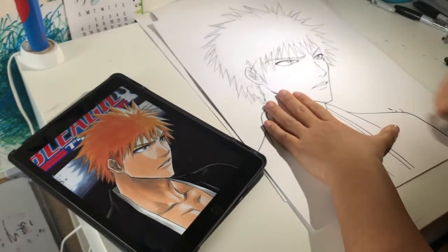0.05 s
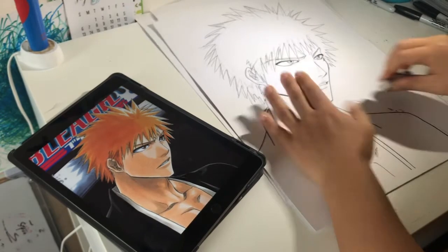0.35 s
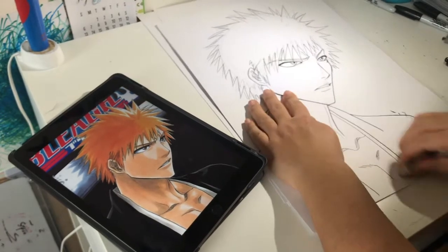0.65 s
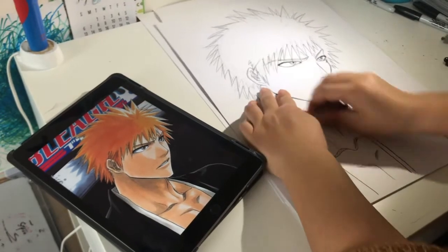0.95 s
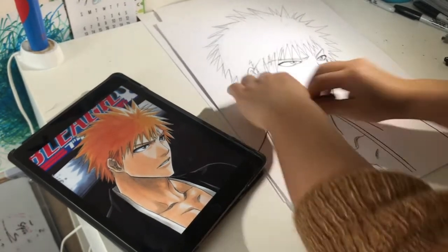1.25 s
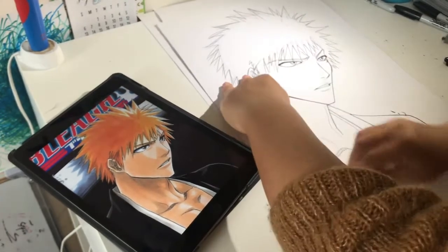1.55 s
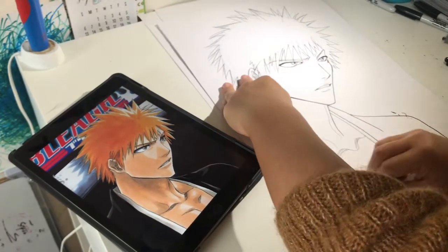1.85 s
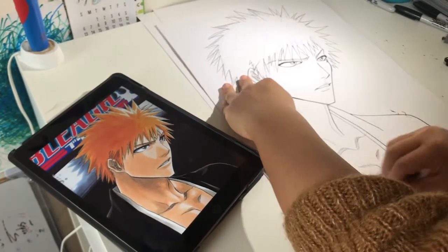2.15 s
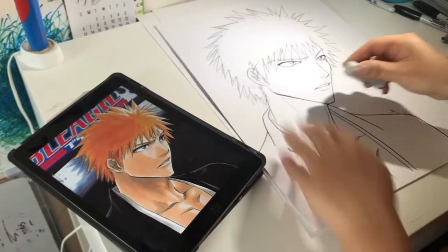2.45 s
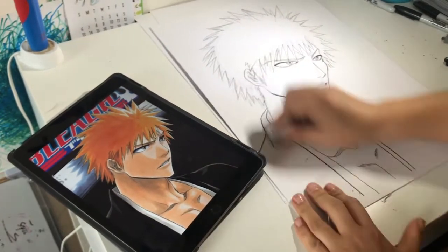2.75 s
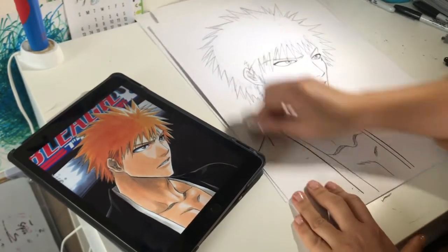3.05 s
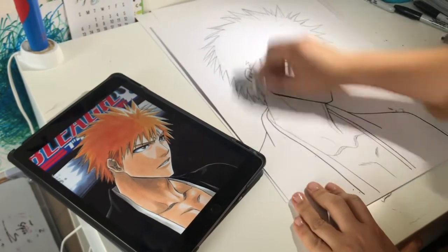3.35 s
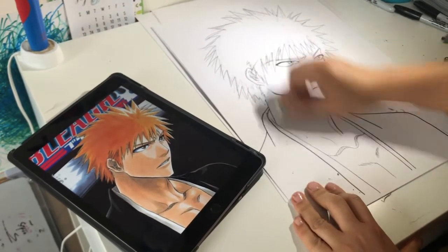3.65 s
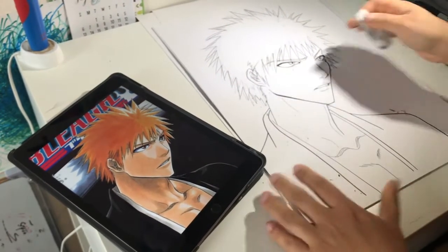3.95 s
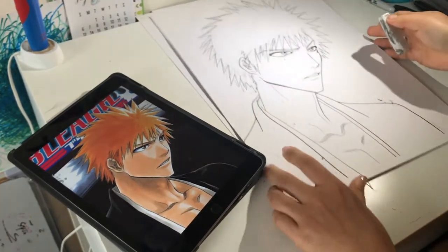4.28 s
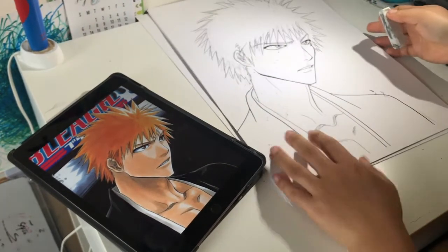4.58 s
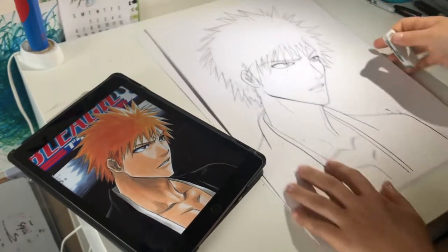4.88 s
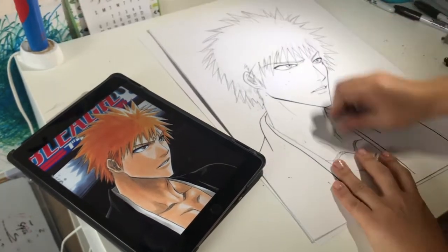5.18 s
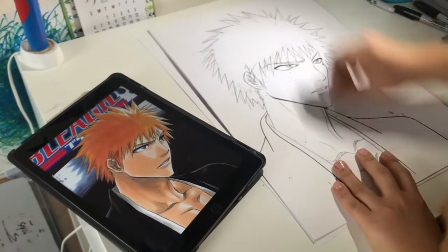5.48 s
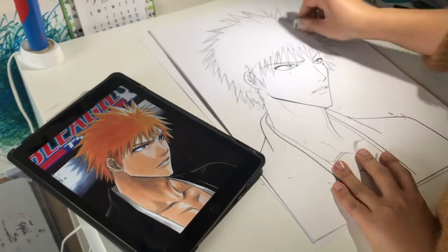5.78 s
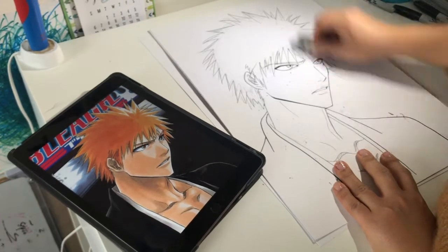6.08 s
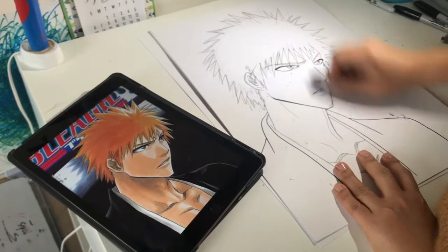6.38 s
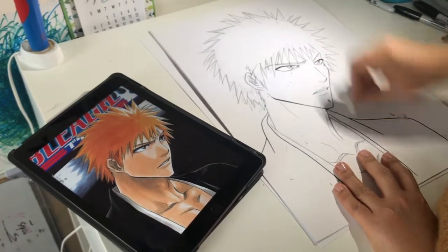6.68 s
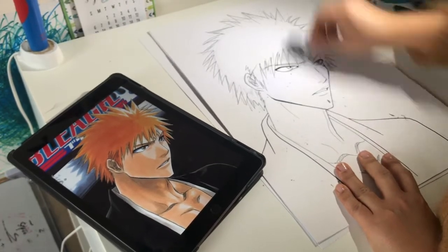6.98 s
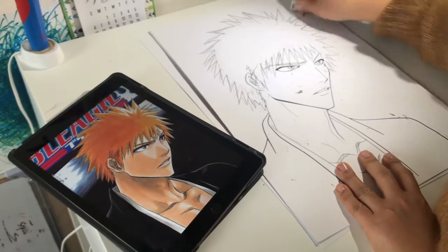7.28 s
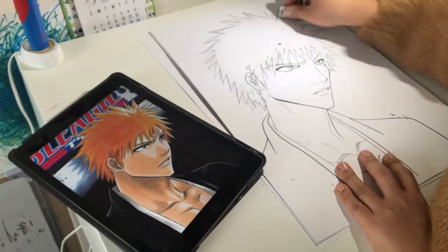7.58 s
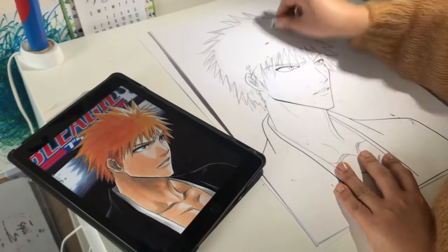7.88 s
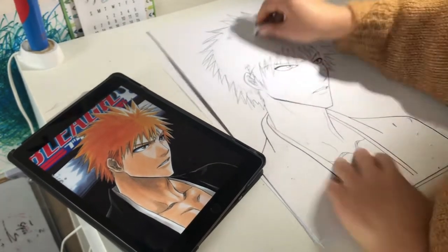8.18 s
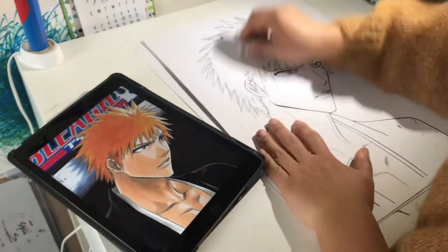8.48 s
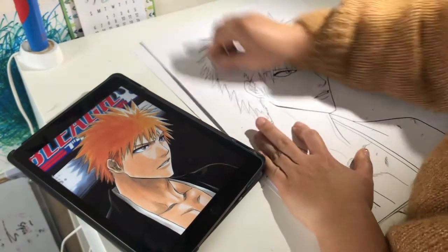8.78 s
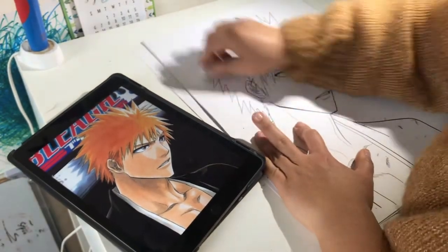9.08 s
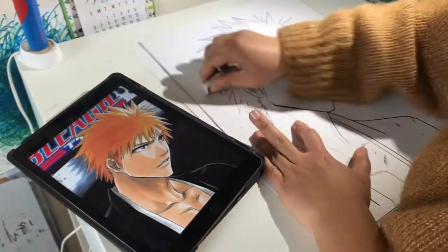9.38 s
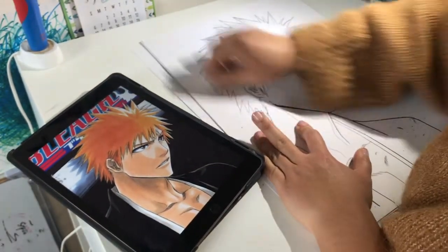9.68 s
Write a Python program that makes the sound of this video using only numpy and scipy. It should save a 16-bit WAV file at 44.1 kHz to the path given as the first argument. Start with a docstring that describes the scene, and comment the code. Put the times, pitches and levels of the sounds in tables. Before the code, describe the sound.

Close to the microphone in a quiet little room, an eraser rasps over paper in separate strokes, mixed with dull hand thuds and a low rumble from the wooden desk. It scrubs briefly, then stops while skin swishes across the sheet with light ticks. The rubbing returns louder, grunting and squeaking a little, and ends in a run of brisk, continuous scrubbing.

```python
"""Eraser on drawing paper

An eraser rubs back and forth over a sheet on a wooden desk, close to a small microphone.
Each landing knocks the desk top; each stroke hisses on the paper's tooth, rasps, and drags the desk
into a low rumble. The rubber sticks and slips in grunts and squeaks. In the pauses a hand thumps
down or slides over the sheet. The room is small and quiet."""
import sys
import numpy as np
from scipy import signal
from scipy.fft import rfft, irfft
from scipy.io import wavfile
from scipy.ndimage import uniform_filter1d

SR = 44100
rng = np.random.default_rng(int(sys.argv[2]) if len(sys.argv) > 2 else 0)


def to_wav(sig):
    """Store sig (one row per channel, or 1-D mono) as 16-bit WAV at the path in sys.argv[1].

    Samples outside -1..1 are clipped; the rate is SR.
    """
    pcm = np.clip(np.atleast_2d(sig), -1, 1) * 32767
    pcm = np.round(pcm).astype(np.int16)
    wavfile.write(sys.argv[1], SR, pcm.T)  # frames by channels


N = 433503
TIME = np.arange(N) / SR

# Swipes, where the eraser lands and drags once:
# (time [s], landing force [dB], contact bandwidth [Hz], drag length [s], drag level [dB])
SWIPES = [(0.492, -27.5, 418, 0.25, -55.5), (0.892, -25.5, 440, 0.26, -60), (1.27, -33, 408, 0.3, -60.5),
          (1.632, -35.5, 417, 0.24, -56), (1.968, -22.5, 537, 0.24, -61.5),
          (2.628, -30.5, 377, 0.23, -54.5), (5.109, -38, 560, 0.28, -52.5), (5.505, -21.5, 520, 0.29, -54),
          (5.912, -23, 551.7, 0.3, -53.5), (6.325, -16.5, 538, 0.27, -53.5), (6.691, -29.5, 620, .26, -53),
          (7.072, -20.5, 485, 0.22, -52.5), (7.398, -26, 388, 0.21, -53)]
# Bouts of scrubbing without lifting: (end [s], list of (turn time [s], next stroke's level [dB]))
SCRUBS = [(0.138, [(-0.03, -59)]), (3.779, [(2.85, -57), (2.97, -57.5), (3.11, -55), (3.235, -56.5),
          (3.395, -54.5), (3.555, -61)]), (9.9, [(7.59, -52.5), (7.73, -52.5), (7.87, -55.5), (8.01, -52.5),
          (8.145, -53.5), (8.295, -56), (8.425, -54.5), (8.585, -56), (8.72, -55.5), (8.88, -59),
          (9.04, -56), (9.22, -57.5), (9.385, -55), (9.55, -55.5), (9.78, -60.5)])]
SWIPE_RISE_S, SWIPE_FALL_S = 0.086, 0.098
SCRUB_RISE_S, SCRUB_FALL_S, TURN_OVERLAP_S = 0.038, 0.058, 0.0076


def strokes():
    """Every stroke as (start, end, rise, fall, dB, forward): swipes go forward, scrubs alternate."""
    out = [(s, s + length, SWIPE_RISE_S, SWIPE_FALL_S, db, True) for s, _, _, length, db in SWIPES]
    for stop, turns in SCRUBS:
        ends = [s for s, _ in turns[1:]] + [stop]
        for k, ((s, db), end) in enumerate(zip(turns, ends)):
            out.append((s, end + TURN_OVERLAP_S, SCRUB_RISE_S, SCRUB_FALL_S, db, k % 2 == 0))
    return out


def glide(start, end, rise_s, fall_s):
    """Speed envelope of one move: it speeds up, holds, and slows to the turn."""
    speed, span = np.zeros(N), slice(*np.searchsorted(TIME, [start, end]))
    speed_up = np.sin(np.pi / 2 * np.clip((TIME[span] - start) / rise_s, 0, 1))
    slow_down = np.sin(np.pi / 2 * np.clip((end - TIME[span]) / fall_s, 0, 1)) ** 2
    speed[span] = speed_up * slow_down
    return speed


# How hard the arm bears down: (time [s], gain [dB])
ARM_PRESSURE = [(.1, 3), (1, -5.5), (1.5, 1), (3.5, 2.5), (5.2, 0.5), (6.8, 1.5), (7.2, 8), (7.8, 9.5),
                (8.25, -3), (8.7, 2), (9.2, -3), (9.8, -0.5)]


def pressure(s):
    """The arm's weight in dB at time s; it pushes up the rumble, scuffs and stray squeaks."""
    return np.interp(s, *np.transpose(ARM_PRESSURE))


# EQ curves for the airy hiss, gritty rasp and woody rumble: (frequency [Hz], level [dB])
HISS_EQ = [(2000, -14), (4500, -2), (5800, 3), (7500, -3.5), (8600, 1.5), (10400, -3.5), (11500, 1.5),
           (16000, -6)]
RASP_EQ = [(500, -23), (950, -15), (1400, 2.5), (2000, -3), (3000, 4), (4400, 1.5), (5200, -16.5),
           (7000, -4.5), (12000, -10)]
RUMBLE_EQ = [(55, -17.5), (85, 4.5), (135, 4), (215, -4.5), (285, 1.5), (400, -8.5), (600, -13),
             (900, -14.5), (1400, -21.5), (2500, -36.5)]
# Where the hand works sets how well it drives the desk's lowest modes: (time [s], bass gain [dB])
DESK_COUPLING = [(1.5, -1), (3.3, 3), (5.6, -7), (7.3, -15), (8.4, -3.5), (9.5, 2)]
HISS_DB, RASP_DB, RUMBLE_DB = 0.5, -1.95, 3.5  # layer trims


def eraser(effort):
    """Fine slips hiss on the paper, coarser ones rasp, and the dragging rubber shakes the desk."""
    grip = wander(55)  # rolling crumbs keep changing the grip
    hiss = unit(colour(slips(14000, spread_db=6.0), HISS_EQ) * undb(1.6 * grip))
    rasp = unit(colour(slips(6000, spread_db=0.72), RASP_EQ) * undb(2.94 * grip + 2 * wander(260)))
    rumble = unit(colour(slips(1500, spread_db=2.2) * undb(2.8 * grip), RUMBLE_EQ))
    coupling = undb(np.interp(TIME, *np.transpose(DESK_COUPLING)))
    rumble = rumble + (coupling - 1) * resonate(rumble, 110, 95)
    rumble_gain = undb(RUMBLE_DB + pressure(TIME))
    return effort * (undb(HISS_DB) * hiss + undb(RASP_DB) * rasp + rumble_gain * rumble)


# Harsh scrapes where the rubber catches: (time [s], decay [s], level [dB])
CATCHES = [(5.178, 0.021, -43), (5.281, 0.025, -41), (6.39, 0.017, -42), (7.155, 0.033, -44.5),
           (7.645, 0.015, -45.5), (7.807, .014, -38)]


def catches():
    """Where the rubber grips hard, a sudden burst of coarse slips rings the sheet."""
    force = sum(undb(db) * (TIME > s) * np.exp(-np.abs(TIME - s) / decay) for s, decay, db in CATCHES)
    grains = slips(2500, spread_db=2.3)
    sheet = resonate(grains, 4600, 1600) + undb(4) * resonate(grains, 3550, 900)
    body = undb(-13) * resonate(grains, 700, 600)
    return force * unit(butter(sheet, 1600, "high", order=2) + body)


def hand_reflections(dry):
    """Reflections off the moving hand and wrist sweep a gentle flange through the rubbing."""
    out = dry
    for lag_s in (.00045, .0016):
        delay = lag_s * np.exp(.15 * wander(7))
        out = out + .25 * np.interp(TIME - delay, TIME, dry)
    return out


def scuffs(effort, per_second=30, decay_s=.008, trim_db=-6.5):
    """Crumbs roll under the rubber; its random stutters sound the board's mids, more under pressure."""
    onsets = 1. * (rng.random(N) < per_second / SR)
    jolts = signal.lfilter([1], [1, -np.exp(-1 / (decay_s * SR))], onsets)
    force = jolts * rng.standard_normal(N)
    board = undb(2) * resonate(force, 470, 240) + resonate(force, 884, 300)
    return effort * undb(trim_db + pressure(TIME)) * unit(butter(board, 1500, "low", order=3))


# Mid-stroke grunts, stronger as the rubber gets tacky: (time [s], level [dB])
GRUNT_LEVELS = [(0, -60), (3.5, -56), (6, -46.5), (7.5, -40), (8.1, -54), (8.5, -43), (9.8, -42)]
# Featured squeaks: (centre time [s], pitch [Hz], level [dB])
SQUEAKS = [(2.755, 295.8, -38), (4.866, 1000, -54), (6.015, 362, -32.5), (7.466, 1078, -40),
           (7.816, 904, -49), (8.751, 617, -51), (9.52, 987, -54.5), (9.81, 546, -46.5)]
GRUNT_HZ, GRUNT_WIDTH_S, SQUEAK_WIDTH_S = 294.2, .034, .014
STRAY_HZ, STRAY_SPREAD_OCT, STRAY_DB = 849, 0.55, -8


def squeak_cues(effort, tries=70):
    """Cues as (centre, width, Hz, dB): a grunt per forward stroke, stray and featured squeaks."""
    centres = [(start + end) / 2 for start, end, *_, forward in strokes() if forward]
    cues = [(s, GRUNT_WIDTH_S, GRUNT_HZ, np.interp(s, *np.transpose(GRUNT_LEVELS))) for s in centres]
    for i, detune in zip(rng.integers(N, size=tries), rng.standard_normal(tries)):
        if effort[i] > 0:  # strays sound only while the rubber moves
            hz = STRAY_HZ * 2 ** (STRAY_SPREAD_OCT * detune)
            db = 20 * np.log10(effort[i]) + STRAY_DB + pressure(TIME[i])
            cues.append((TIME[i], SQUEAK_WIDTH_S / 2, hz, db))
    return cues + [(s, SQUEAK_WIDTH_S, hz, db) for s, hz, db in SQUEAKS]


def squeaks(cues):
    """Stick and slip lock into a rough, sagging note: a grunt under load, a squeak at a light grip."""
    out = np.zeros(N)
    for (s, width, hz, db), (timing, grip) in zip(cues, rng.standard_normal((len(cues), 2, 1024))):
        span = slice(*np.searchsorted(TIME, [s - 2 * width, s + 2 * width]))
        offset = (TIME[span] - s) / width
        cycle, index = (offset + 2) * width * hz, np.arange(len(grip))
        jitter = 0.14 * np.interp(cycle, index, timing)  # no two slips are equally long
        pitch = hz * np.exp(-.04 * offset + jitter)
        force = undb(db + 5 * np.interp(cycle / 2, index, grip)) * np.exp(-2 * offset ** 2)
        out[span] += force * np.sin(2 * np.pi * np.cumsum(pitch) / SR)
    return out


# Hands and wrists dropping on the desk: (time [s], force [dB], contact bandwidth [Hz])
HAND_THUMPS = [(.068, -40, 242), (0.174, -63, 221), (0.45, -45, 171), (.728, -55, 209), (.644, -29, 288),
               (1.074, -49.5, 240), (1.477, -27.5, 271), (1.774, -21, 268), (2.046, -22.5, 253),
               (2.123, -37, 248), (3.994, -56, 298), (4.38, -37.5, 208), (4.429, -31, 103),
               (5.079, -18, 182.3), (8.289, -23, 182), (8.839, -45, 320)]


def desk():
    """The eraser's edge knocks on the desk top; soft flesh gives a round thud."""
    landings = [swipe[:3] for swipe in SWIPES]
    out = knocks(landings, weight_db=-1, bounce_db=6, bounce_ratio=0.86, bounce_width=0.41, order=3)
    out += knocks(HAND_THUMPS, weight_db=-0.5, bounce_db=9.5, bounce_ratio=0.834, bounce_width=0.22,
                  order=4)
    for hz in (560, 380):  # all-passes: bending waves disperse, so the lows arrive after the highs
        out = out - 2 * resonate(out, hz, 0.83 * hz)
    return butter(out, 69, "high", order=6)


# The desk top's wooden ring, lowest mode first: (frequency [Hz], level [dB], 60 dB decay time [s])
DESK_MODES = [(90, -12, .18), (120, -2.5, .12), (143, -5.5, .19), (187, -8, .16), (243, -14, .13),
              (274, -6.5, .09), (327, -9, .05), (366, -10, .12), (397, -6, .055), (470, -12, .12),
              (534, -13, .13), (574, 2.2, .058), (670, -7.5, .1), (720, 9, .022), (882, -4.2, .12),
              (995, 9, .034), (1240, 15, .018), (1460, 6, .07)]


def knocks(blows, weight_db, bounce_db, bounce_ratio, bounce_width, order):
    """Blows ring the desk top; the softer the contact, the lower the modes that it reaches."""
    t = np.arange(32768) / SR
    modes = np.array([undb(db) * np.cos(2 * np.pi * hz * t) * np.exp(-np.log(1000) * t / t60)
                      for hz, db, t60 in DESK_MODES])
    bass, upper = modes[:3].sum(0), modes[3:].sum(0)
    out = np.zeros(N)
    for s, db, contact_hz in blows:
        # the arm's weight drives the lowest modes
        bass_db = weight_db + blow_db(db, contact_hz, base_db=5.7, per_db=-0.44, per_octave=7.7)
        ring = butter(undb(bass_db) * bass + upper, contact_hz, "low", order=order)
        # rubber and flesh are springy
        bounce = resonate(ring, bounce_ratio * contact_hz, bounce_width * contact_hz)
        add(out, s, undb(db) * (ring + undb(bounce_db) * bounce))
    return out


def blow_db(force_db, contact_hz, base_db, per_db, per_octave):
    """A layer's gain tracks force and hardness, around a typical blow of -25 dB and 450 Hz."""
    return base_db + per_db * (force_db + 25) + per_octave * np.log2(contact_hz / 450)


def slaps():
    """Each blow also slaps the sheet, flesh a little louder than rubber."""
    hits = [(s, blow_db(db, hz, base_db=-34, per_db=0.53, per_octave=19.3) + flesh_db)
            for blows, flesh_db in ((SWIPES, 0), (HAND_THUMPS, 1)) for s, db, hz, *_ in blows]
    return undb(-0.5) * paper_hits(hits, attack_s=0.0014, crack_s=0.0029, tail_s=0.027, tail_db=-17.5)


# Small touches of paper and fingers: (time [s], level [dB])
TICKS = [(0.2594, -43), (.453, -40.5), (0.835, -48.5), (1.477, -45), (1.556, -52), (1.771, -53),
         (1.966, -29), (2.512, -49.5), (2.581, -50.5), (2.624, -26.5), (3.305, -43), (4.302, -38),
         (4.38, -40.5), (4.6645, -44), (4.972, -47.5), (5.0745, -26), (5.858, -46), (6.257, -47),
         (6.326, -34), (6.6486, -46), (6.997, -51), (8.29, -36.5), (8.305, -42), (8.892, -40)]


def ticks():
    """Light contacts with the sheet give thin, crisp ticks."""
    snaps = paper_hits(TICKS, attack_s=0.00039, crack_s=0.00085, tail_s=0.012, tail_db=-10)
    return undb(1.5) * butter(snaps, 1200, "high", order=2)


# EQ curve of struck paper: (frequency [Hz], level [dB])
PAPER_HIT_EQ = [(300, 3.5), (900, 13.5), (1400, 8.5), (2100, 2.5), (3500, 5), (6000, -1.5), (9000, -8.5),
                (16000, -13.5)]


def paper_hits(hits, attack_s, crack_s, tail_s, tail_db, lead_s=.012):
    """A sharp contact presses the paper flat; it cracks, then flutters briefly."""
    t = np.arange(SR // 5) / SR
    before, after = np.maximum(lead_s - t, 0), np.maximum(t - lead_s, 0)
    decay = np.exp(-after / crack_s) + undb(tail_db) * np.exp(-after / tail_s)
    envelope = np.exp(-before / attack_s) * decay
    out = np.zeros(N)
    for (s, db), noise in zip(hits, rng.standard_normal((len(hits), len(t)))):
        add(out, s - lead_s, undb(db) * envelope * noise)
    return colour(out, PAPER_HIT_EQ)


# Knuckles and the eraser's stiff sleeve hitting the board: (time [s], force [dB])
CLACKS = [(0.894, -32.5), (1.398, -48), (1.476, -45.5), (1.773, -41), (1.966, -25.5), (4.302, -44.5),
          (5.085, -41)]


def clacks(decay_s=0.0091):
    """A hard edge makes the drawing board under the sheet ring briefly."""
    t = np.arange(4096) / SR
    force = np.zeros(N)
    for s, db in CLACKS:
        add(force, s, undb(db) * np.exp(-t / decay_s) * rng.standard_normal(len(t)))
    body = resonate(resonate(force, 990, 610), 990, 610)
    edge = undb(-21) * resonate(force, 2700, 700)
    return undb(18.5) * (body + edge)


# Hand slides: (start [s], end [s], rise [s], fall [s], hiss level [dB], skin level [dB])
HAND_SLIDES = [(0.446, 0.49, 0.01, 0.07, -65, -42), (2.164, 2.53, 0.13, 0.4, -68, -56),
               (3.715, 3.98, 0.037, 0.22, -75, -67.5), (4.09, 4.41, 0.025, 0.061, -62, -54.5),
               (4.683, 4.962, 0.041, 0.15, -44, -44.5), (5.33, 5.503, .04, .1, -72, -57.5),
               (7.285, 7.353, .01, 0.064, -85, -57), (8.045, 8.357, 0.16, 0.087, -55, -53)]
# EQ curve of rasping skin: (frequency [Hz], level [dB])
SKIN_EQ = [(80, 13), (450, 0.5), (600, 9), (780, -4), (1400, 4.5), (2200, 4.5), (3100, 10), (4400, 6),
           (6500, -0.5), (12000, -4)]


def hand_slides():
    """Dry skin on paper gives a smooth swish."""
    hiss = unit(colour(rng.standard_normal(N), HISS_EQ))
    skin = unit(colour(slips(12000, spread_db=2.5) * undb(1.3 * wander(70)), SKIN_EQ))
    return sum(glide(*move) * (undb(hiss_db) * hiss + undb(skin_db) * skin)
               for *move, hiss_db, skin_db in HAND_SLIDES)


def reverb(dry, t60_s, wet_db, predelay_s=.006):
    """Nearby walls and furniture answer with a short, dull tail."""
    t = np.arange(SR // 2) / SR
    tail = rng.standard_normal(len(t)) * np.exp(-np.log(1000) * t / t60_s) * (t > predelay_s)
    tail = butter(tail / np.linalg.norm(tail), 7500, "low", order=1)
    return dry + undb(wet_db) * signal.fftconvolve(dry, tail)[:N]


# EQ curve of the quiet room: (frequency [Hz], level [dB])
ROOM_TONE_EQ = [(30, -17.5), (100, -6), (200, -8), (400, -10), (1000, -18.5), (3000, -25.5), (8000, -30.5),
                (16000, -34.5)]


def room_tone():
    """A faint, dark bed of steady noise."""
    return undb(-63.5) * unit(colour(rng.standard_normal(N), ROOM_TONE_EQ))


def undb(db):
    """Decibels to gain."""
    return 10 ** (np.asarray(db) / 20)


def unit(x):
    """Scale to rms 1."""
    return x / np.sqrt(np.mean(x ** 2))


def add(track, s, sound):
    """Mix a sound in at time s."""
    i = max(int(s * SR), 0)
    track[i:i + len(sound)] += sound[:max(N - i, 0)]


def butter(x, hz, kind, order):
    """Causal low-pass or high-pass."""
    return signal.sosfilt(signal.butter(order, min(hz, .45 * SR), kind, fs=SR, output="sos"), x)


def colour(x, points, size=4096):
    """Minimum-phase EQ shaped by (Hz, dB) points and scaled to unit power."""
    hz, db = np.transpose(points)
    gain = undb(np.interp(np.log(np.fft.rfftfreq(size, 1 / SR) + 1), np.log(hz), db))
    cepstrum = irfft(np.log(gain))
    cepstrum[size // 2:] = 0
    response = irfft(np.exp(2 * rfft(cepstrum)))
    return signal.fftconvolve(x, response / np.linalg.norm(response))[:len(x)]


def resonate(x, hz, width_hz):
    """One resonant band-pass."""
    return signal.lfilter(*signal.iirpeak(hz, hz / width_hz, fs=SR), x)


def wander(per_second):
    """Smooth random modulation of rms 1."""
    step = max(int(SR / per_second), 1)
    held = np.repeat(rng.standard_normal(N // step + 1), step)
    return unit(uniform_filter1d(held, step)[:N])


def slips(per_second, spread_db):
    """Friction grains: tiny slips of random timing and size."""
    onsets = rng.random(N) < per_second / SR
    return onsets * rng.standard_normal(N) * undb(spread_db * rng.standard_normal(N))


def scene():
    """Rubbing, knocks and ticks over quiet room tone, in mono."""
    effort = sum(undb(db) * glide(*move) for *move, db, _ in strokes())
    contacts = slaps() + ticks()
    rubbing = hand_reflections(eraser(effort) + catches()) + scuffs(effort)
    paper = rubbing + hand_slides() + squeaks(squeak_cues(effort)) + contacts + clacks()
    foreground = reverb(paper, t60_s=0.38, wet_db=-11) + reverb(desk(), t60_s=0.3, wet_db=-16.5)
    return (foreground + room_tone())[None]


def record(dry):
    """The microphone loses the deep bass and the very top."""
    high_cut = signal.ellip(10, .2, 70, 16200, fs=SR, output="sos")
    return signal.sosfilt(high_cut, butter(dry, 29, "high", order=2))


dry = scene()
out = record(dry)
to_wav(out)
```